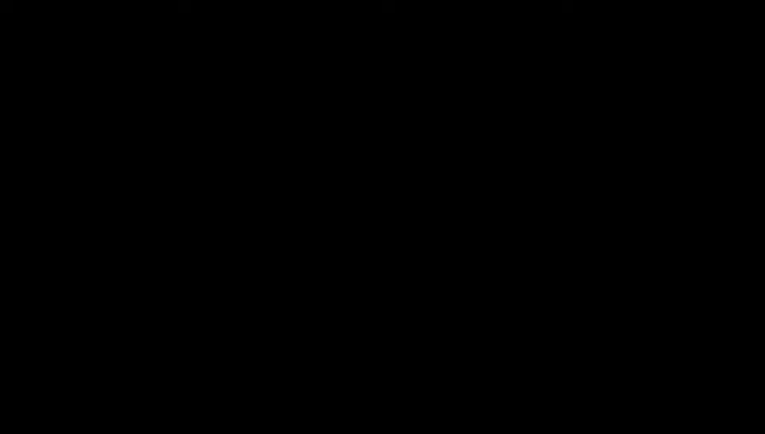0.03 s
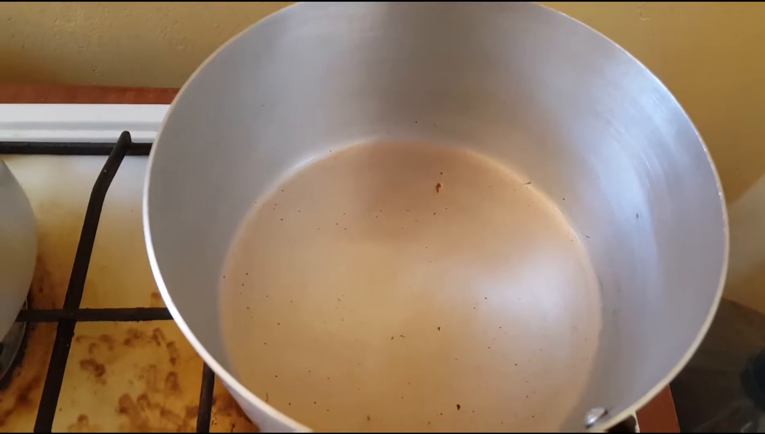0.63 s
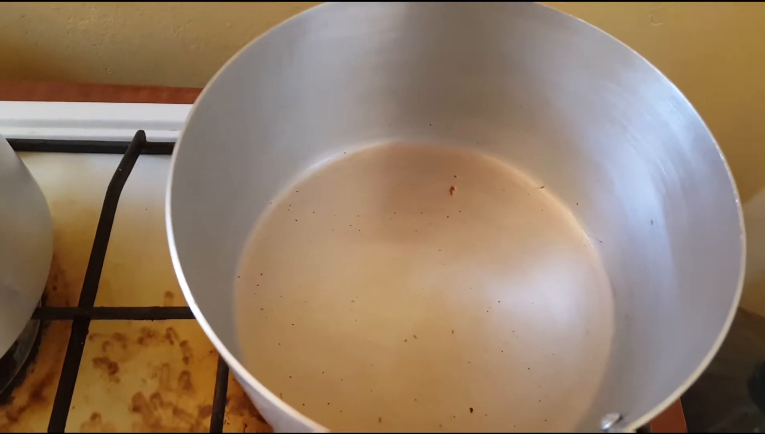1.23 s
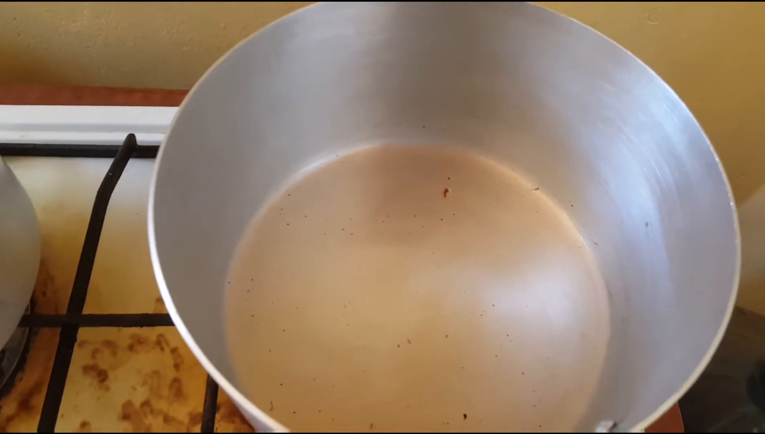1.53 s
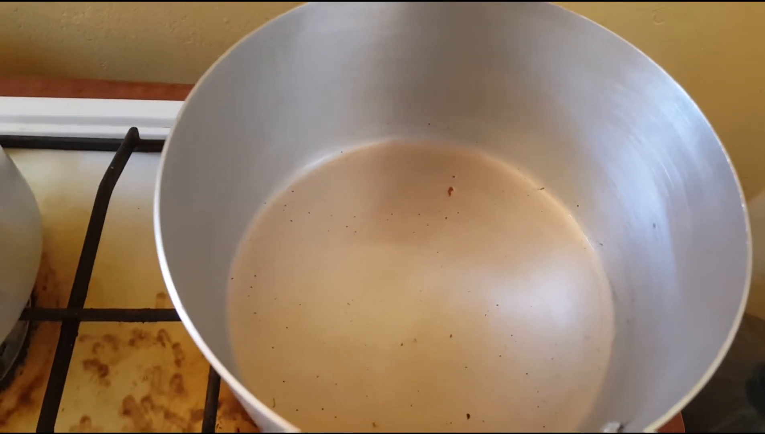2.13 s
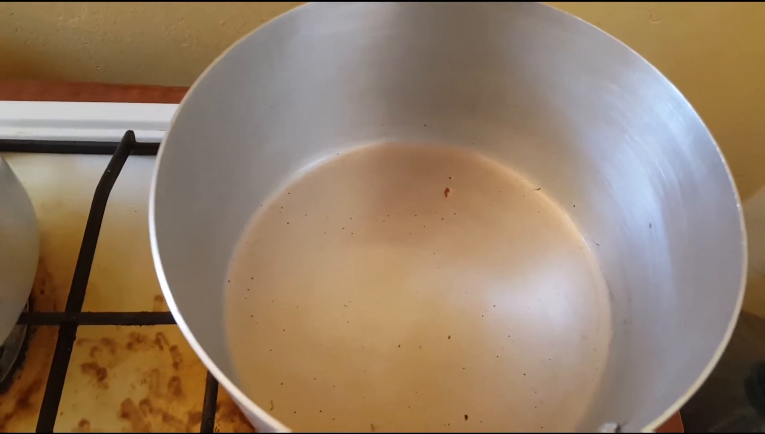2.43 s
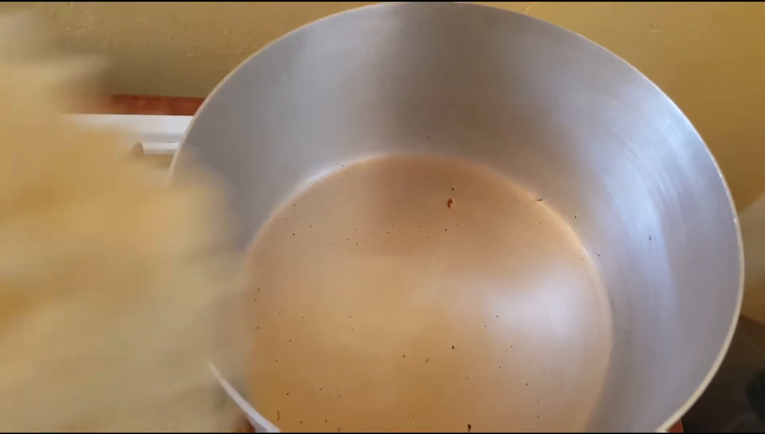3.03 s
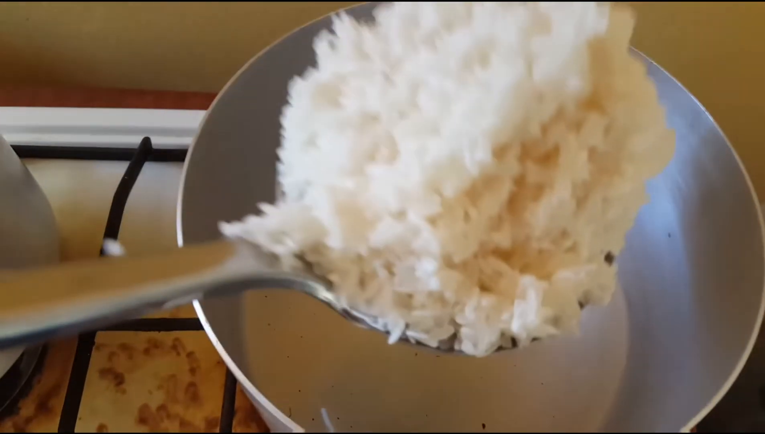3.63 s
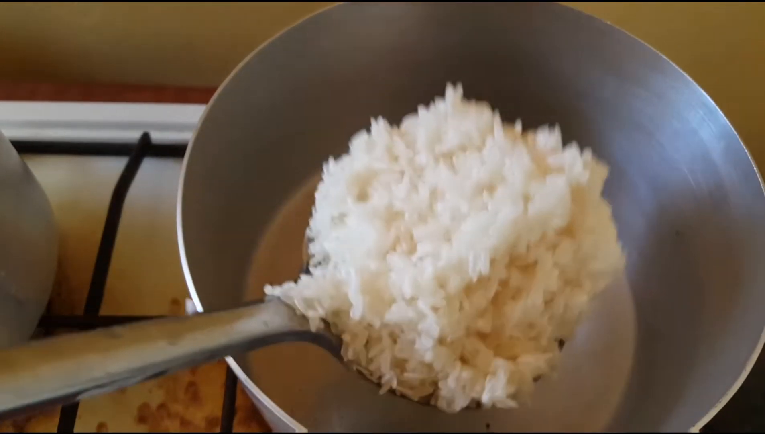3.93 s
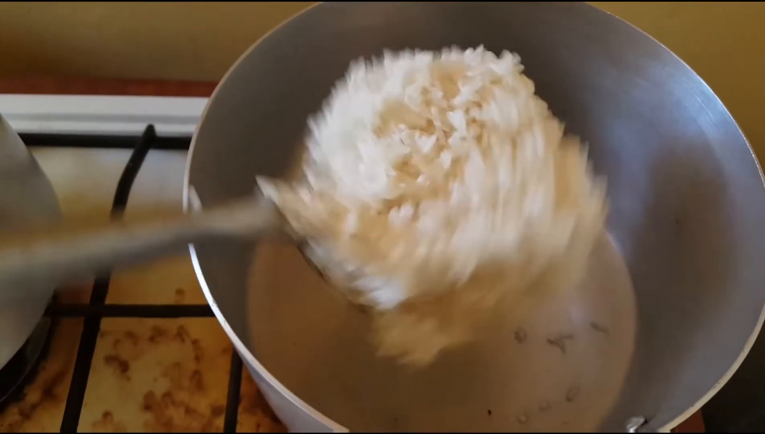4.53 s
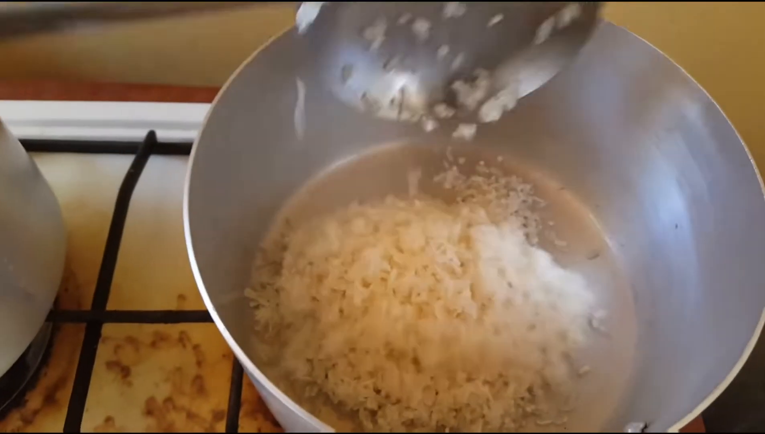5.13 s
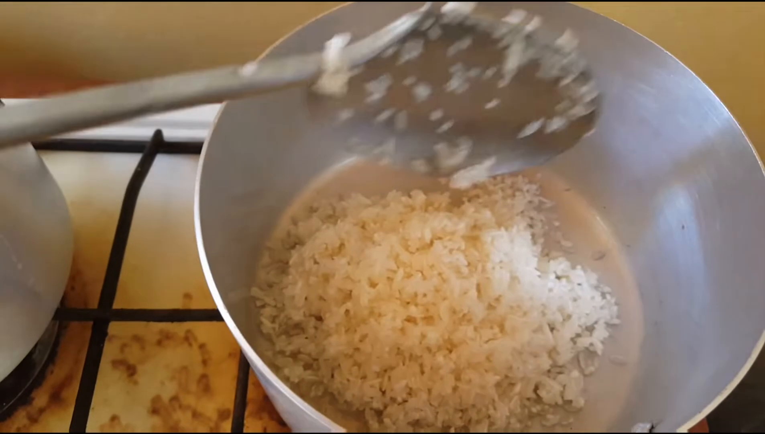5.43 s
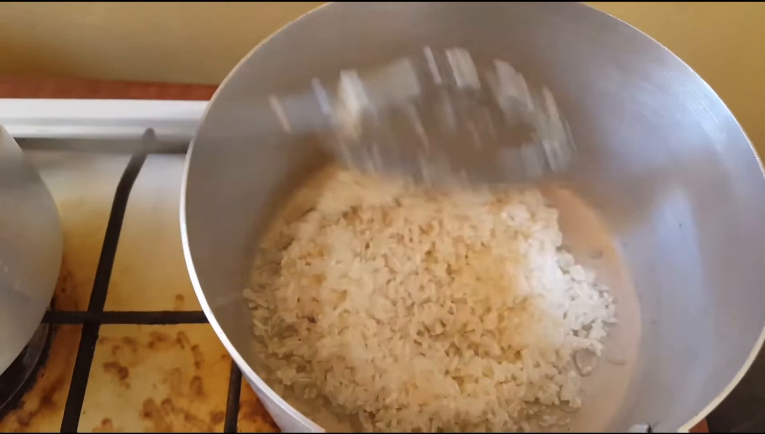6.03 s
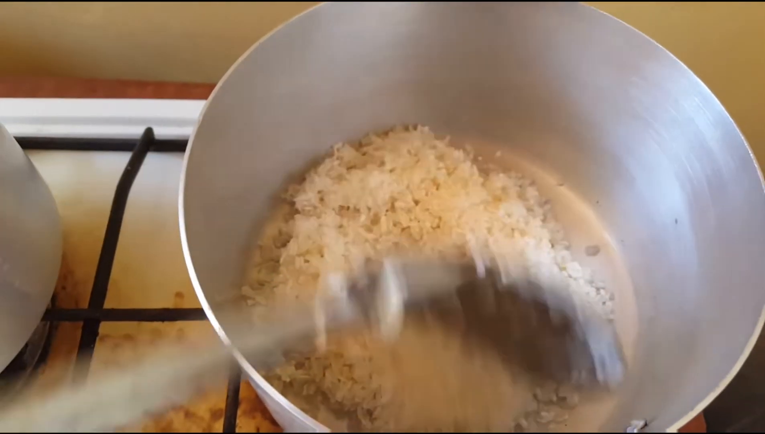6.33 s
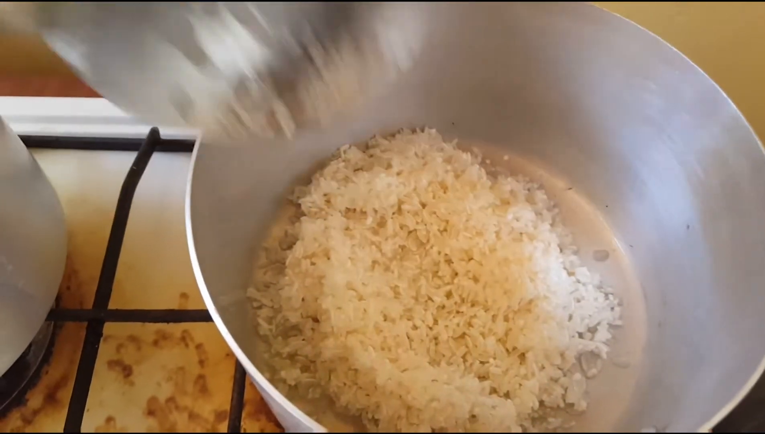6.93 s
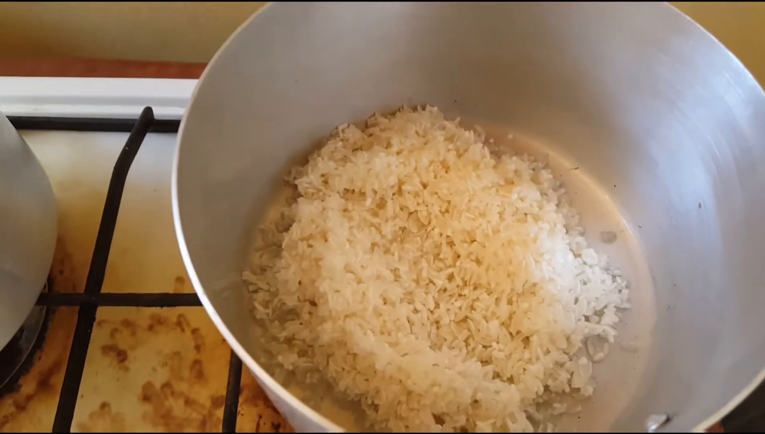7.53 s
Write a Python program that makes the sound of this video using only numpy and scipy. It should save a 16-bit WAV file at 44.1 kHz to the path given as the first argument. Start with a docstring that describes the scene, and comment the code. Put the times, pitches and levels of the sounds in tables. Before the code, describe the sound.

For the first four seconds there is only the very faint, low rush of a gas flame in a small kitchen. A soft knock of kitchenware comes at about 1 second, with a few more faint knocks and scuffs between 2.7 and 3.6 seconds. At 4.2 seconds a spoon taps a metal pot, giving a short, bright ring and a quick, lighter chatter. Stray grains tick softly in the hot oil. At 4.7 seconds clumps of cooked rice land with a soft, wet splat and a faint low hum from the pot. A loud, close sizzle starts at once: fine hiss and crackle over duller bubbling, dotted with sharp, irregular pops, sounding slightly hollow inside the pot. The strongest pops come around 5.5 and 5.8 seconds. The sizzle grows a little louder near 6 seconds and carries on, popping, until the end at about 8 seconds.

```python
"""A low gas flame rushes softly in a small kitchen, with a few faint knocks and scuffs nearby.
A spoon taps a wide aluminium pot of hot oil, exciting the metal's modes, and stray grains spit.
Then a spoonful of cooked rice lands and fries: its water flashes to steam in countless bursts,
each one swing of pressure, heard as fizz, bubbling and pops that ring the air in the pot and the room."""
import sys
import numpy as np
from scipy import signal
from scipy.fft import rfft, irfft
from scipy.io import wavfile

SR = 44100
rng = np.random.default_rng(int(sys.argv[2]) if len(sys.argv) > 2 else 0)


def wav_record(signal):
    """Record a signal, one row per channel, as 16-bit PCM in the file named by sys.argv[1]."""
    frames = np.transpose(np.atleast_2d(signal))
    bounded = np.clip(frames, -1, 1)
    # unit amplitude maps onto the largest positive 16-bit level
    quanta = np.round(bounded * 32767).astype(np.int16)
    wavfile.write(sys.argv[1], SR, quanta)


N = 343539
TIME = np.arange(N) / SR

# spectrum of the gas flame and the quiet kitchen: f/Hz, level/dB
FLAME_SPECTRUM = [(15, -71), (25, -1.5), (46, -13), (64, -1), (84, 1), (113, -11.5), (160, -13), (188, -18),
                  (267, -23), (537, -23.5), (598, -23.5), (826, -28), (2120, -31.5), (6380, -42.5),
                  (15500, -45.5)]
# spectrum of a thin background hiss: f/Hz, level/dB
HISS_SPECTRUM = [(10000, -11), (13000, 2), (15000, 7)]
# faint room hums and a thin whistle: f/Hz, bandwidth/Hz, level/dB
HUM_BANDS = [(71.4, 11.5, -83.5), (275.7, 13.6, -89), (396, 11.6, -95), (888, 81, -93), (7240, 90, -102)]
# fade-in of the background: t/s, gain/dB
BACKGROUND_FADE = [(0, -76), (.1, -66), (.13, 3), (.5, 5.5), (.9, 7.5)]
# soft scuffs: t/s, level/dB, f/Hz, half length/s
SCUFF_EVENTS = [(2.84, -71, 950, .033), (3.385, -72, 430, .028)]
# knocks of kitchenware: t/s, level/dB, f/Hz, T60/s, clack level/dB
KNOCK_EVENTS = [(1.034, -51, 380, 0.3, -59.5), (1.236, -63.5, 1290, .08, -79), (2.714, -63, 750, .05, -80),
                (2.979, -59.5, 1450, 0.036, -57.5), (3.572, -58, 280, 0.11, -59.5)]
# spectrum of a knock's hard clack: f/Hz, level/dB
CLACK_SPECTRUM = [(160, 7), (260, -1), (600, -1.5), (900, 3), (1150, -10), (1480, 3), (1750, -8),
                  (2100, 4.5), (2400, -12), (2650, 0.5), (3000, -15), (4000, -13), (6000, -28),
                  (15000, -39)]
# taps of the spoon on the pot: t/s, level/dB
TAP_EVENTS = [(4.2319, -27.5), (4.324, -41.5), (4.3492, -50.5)]
# modes of the struck metal: f/Hz, level/dB, T60/s
METAL_MODES = [(1380, -4.5, .12), (1960, -8.5, .12), (2250, 2, 0.035), (2540, -2, 0.15), (2772, -7, 0.21),
               (3536, -0.5, .2), (3660, -9, .15), (4000, -11, .22), (4740, -13, 0.39), (5500, -13, 0.29),
               (5701, -12, 0.41), (6000, -10, 0.2), (6869, -8.5, 0.39), (6900, -7, .24), (7050, -13, .22),
               (8250, -9, 0.23), (8380, -7, 0.27), (9502, -7, .1), (9792, -14, .4), (11600, -7, .14),
               (12890, -4, 0.13), (14600, -16, .22)]
# spectrum of a tap's dense clatter: f/Hz, level/dB
CLATTER_SPECTRUM = [(300, -27), (700, -16), (1400, -3.5), (1800, -7), (2300, 1), (3000, -12), (3500, -1),
                    (4300, -9), (5800, -1.5), (6400, -13), (7100, 5), (7700, -12), (9300, -3), (10300, -11),
                    (12400, -5), (12950, 4), (13500, -8), (15500, -10)]
# stray grains spitting in the oil: t/s, level/dB, f/Hz
SPIT_EVENTS = [(4.3996, -42.5, 8000), (4.442, -52, 7000), (4.502, -52.5, 7000), (4.545, -57, 6900),
               (4.566, -54.5, 6780), (4.636, -47.5, 12200), (4.659, -55.5, 3940), (4.6795, -56.5, 7000),
               (5.95, -19, 8550), (6.435, -29, 2750), (7.535, -26, 2700)]
# spectrum of the metal's shimmer after a spit: f/Hz, level/dB
SHIMMER_SPECTRUM = [(1000, -21), (4000, -12), (5500, -1), (6300, -3), (6950, 6), (7700, -16), (8600, -1),
                    (12500, -17), (15500, -17)]
# clumps of rice landing: t/s, level/dB, half length/s
RICE_CLUMPS = [(4.731, -27.5, 0.0047), (4.766, -30, 0.021), (4.852, -37, 0.028), (4.905, -34, 0.0045),
               (4.996, -41, 0.023)]
# spectrum of the landing rice: f/Hz, level/dB
SPLAT_SPECTRUM = [(60, -8), (170, -8), (280, -12), (400, -5), (520, -26), (650, 4), (900, -18), (1370, 4.5),
                  (1700, 8.5), (2500, -4.5), (6000, -9)]
# modes of the pot's base: f/Hz, bandwidth/Hz, gain/dB
BASE_MODES = [(130, 4, -3), (653, 41, 11.5), (1390, 76, 11), (5250, 37, 6)]
# flares as fresh rice meets the oil: t/s, fizz level/dB, bubbling level/dB, half length/s
FRYING_FLARES = [(4.738, -40, -37, 0.0097), (4.88, -33, -60, .065), (4.983, -33.5, -36.5, 0.023),
                 (5.284, -33.5, -53, 0.057), (5.6, -57, -40.5, 0.035), (5.784, -34.5, -40, 0.033),
                 (5.916, -49, -39, 0.04), (6.48, -32.5, -44, 0.11), (7.192, -34.5, -53, 0.068),
                 (7.617, -48, -48, 0.085)]
# spectrum of the coarse bubbling: f/Hz, level/dB
BUBBLING_SPECTRUM = [(40, -14), (80, -12), (150, -14.5), (300, -19), (550, -2.5), (1000, -4.5),
                     (1400, -4.5), (1800, -2), (2400, -4), (3500, -9), (8000, -38.5)]
# spectrum of the fine fizz: f/Hz, level/dB
FIZZ_SPECTRUM = [(300, -26), (1200, -17.5), (2400, -3.5), (3600, -4.5), (5400, -0.5), (6300, -2.5),
                 (8700, 1), (9400, -0.5), (10200, -7.5), (12000, -2.5), (15800, -6.5)]
# loudest steam bursts: t/s, level/dB, f/Hz, snap of the oil film (0-1), depth under the rice (0-1)
STEAM_POPS = [(4.9378, -17.5, 6660, .7, 0.2), (4.961, -21, 5730, .8, 0), (4.989, -27, 900, 1, .4),
              (5.0576, -15, 6500, .4, 0.05), (5.0778, -12, 6660, .4, 0.2), (5.0916, -16, 9000, .6, 0.63),
              (5.2074, -17.5, 7000, .7, 0.4), (5.2457, -18, 1800, 1, 0.05), (5.3985, -16.5, 1350, .1, 0),
              (5.464, -13.5, 8000, 0.2, 0.15), (5.471, -16.5, 1808, .1, 0), (5.5451, -8, 7500, .6, 0.2),
              (5.5791, -25, 1130, .2, 0), (5.606, -21, 3140, 1, 0.1), (5.6179, -31, 2450, .4, 0.65),
              (5.6816, -15.5, 2180, .3, 0.14), (5.7345, -17, 1700, .5, 0.46), (5.8167, -19, 1200, 0.9, 1),
              (5.835, -9, 9800, 0.7, 0.2), (5.8688, -16.5, 5940, 1, 0.2), (5.98, -20, 2820, 1, 0.34),
              (6.0502, -17, 9500, .8, 0), (6.162, -29, 620, 0.9, 0.94), (6.3038, -15, 3180, 0.4, 0),
              (6.3345, -12, 9000, .7, 0.1), (6.487, -17, 8000, .9, 0.44), (6.5359, -13, 3650, .2, 0.43),
              (6.559, -15, 2330, 0.5, 0.6), (6.6146, -11.5, 4250, .5, 0), (6.6716, -17.5, 2800, 0.8, 0.33),
              (6.7848, -19, 1270, 1, 0.51), (7.2764, -10, 9000, .8, 0), (7.4474, -28.5, 700, .5, 0.55),
              (7.5167, -13, 2500, 0.1, 0.2)]
# shading of the pot's mouth by the spoon: t/s, share (0-1)
SPOON_SHADING = [(4.7, 0.26), (5.05, 0.7), (5.16, 0.83), (5.66, 0.75), (5.8, 0.4), (6.5, 0.44),
                 (6.85, 0.07), (7.8, 0.04)]
# air modes of the pot: f/Hz, bandwidth/Hz, gain when open/dB, gain under the spoon/dB
CAVITY_MODES = [(378, 9, 8.5, 8), (500, 11, -5, 3.5), (607, 16, 7, 10), (683, 25, 4.5, 7), (755, 15, 7, 3),
                (950, 13, 4, 7.5), (1276, 68, -3.5, 11.5), (1365, 36, 9, -0.5), (1472, 69, 8.5, -1),
                (1815, 200, -5.5, 2.5), (2088, 33, 1, 14), (2533, 49, 4.5, -5), (2770, 70, 5, 1.5),
                (3875, 25, 7.5, 2), (4950, 59, 5.5, -7), (6800, 49, 4, 3), (8920, 70, 2.5, 1)]

LANDS_S, CATCH_S = 4.707, .035  # the rice meets the oil; rise time of the frying
FIZZ_HEAPED_DB, FIZZ_SPREAD_DB = -34, -29.5  # spread rice fizzes louder than heaped rice
SPREAD_S, SPREAD_TAKES_S = 5.984, 0.065
BUBBLING_DB, BUBBLING_DB_PER_S = -42.5, 2  # bubbling builds as the grains heat through
DRUM_HZ, DRUM_DB, DRUM_T60_S = 164, -49.5, 1.25  # the first clump's weight sets the whole base humming
SMALL_POP_HZ = 1900, 11500  # lowest and highest pitch
SMALL_POP_DB, SMALL_POP_DB_PER_OCTAVE, SMALL_POP_SPREAD_DB = 4.5, 1.5, 4.5  # relative to the fizz
SNAP_HZ, SNAP_DB = 9500, 3  # a full snap of the oil film, relative to its burst
THUMP_HZ, THUMP_DB = 178, -35.5  # a buried pocket heaves the rice above it


def undb(db):
    """Amplitude ratio: tenfold for every 20 dB."""
    return 10 ** (np.asarray(db) / 20)


def unit(x):
    """Normalisation to rms 1."""
    return x / np.sqrt(np.mean(x ** 2) + 1e-18)


def curve(table):
    """Linear interpolation of (t, value) points at every sample."""
    return np.interp(TIME, *np.transpose(table))


def add(out, s, sound):
    """Superposition: a sound joins the mix at s seconds."""
    i = max(int(round(s * SR)), 0)
    out[i:i + len(sound)] += sound[:max(N - i, 0)]


def colour(x, points, size=4096):
    """Minimum-phase filtering through (f/Hz, level/dB) points, with unit power gain."""
    hz, db = np.transpose(points)
    bin_hz = np.maximum(np.arange(size // 2 + 1) * SR / size, 1)
    gain = undb(np.interp(np.log(bin_hz), np.log(hz), db))
    cepstrum = irfft(np.log(gain))
    cepstrum[1:size // 2] *= 2  # folding the cepstrum makes the response causal
    cepstrum[size // 2 + 1:] = 0
    response = irfft(np.exp(rfft(cepstrum)))
    return signal.oaconvolve(x, response / np.linalg.norm(response))[:len(x)]


def resonate(x, hz, width):
    """Second-order resonance, gain 1 at its centre."""
    return signal.lfilter(*signal.iirpeak(hz, hz / width, fs=SR), x)


def noise_band(samples, hz, width):
    """Band-limited noise from two resonances in series, rms 1."""
    return unit(resonate(resonate(rng.standard_normal(samples), hz, width), hz, width))


def fade(t60):
    """Exponential decay by 60 dB in t60 seconds, one second long."""
    return np.exp(-np.log(1000) * TIME[:SR] / t60)


def swell(s, half_length):
    """Gaussian envelope centred on s seconds, peak 1."""
    return np.exp(-.5 * ((TIME - s) / half_length) ** 2)


def wander(rate):
    """Random modulation: ramps between `rate` values a second, with a spread near 1."""
    return np.interp(TIME * rate, np.arange(N), rng.standard_normal(N)) * np.sqrt(3 / 2)


def impulses(rate, spread_db, ceiling_db):
    """Poisson process: `rate` impulses a second, of capped log-normal size, at rms 1."""
    happens = rng.random(N) < rate / SR
    size = undb(np.minimum(spread_db * rng.standard_normal(N), ceiling_db))
    return unit(happens * size * np.sign(rng.standard_normal(N)))


def tail(t60):
    """Reverberation: dense, exponentially decaying reflections with unit energy."""
    echoes = (rng.standard_normal(SR) * fade(t60))[:int(t60 * SR) + 1]
    return echoes / np.linalg.norm(echoes)


def scatter(x, t60):
    """Diffuse reflection: each burst starts at its own spot, so gets its own tail of equal energy."""
    retained = np.exp(-2 * np.log(1000) / (t60 * SR))
    energy = signal.lfilter([0, 1 - retained], [1, -retained], x ** 2)
    return np.sqrt(energy) * rng.standard_normal(N)


def flame_and_room():
    """Broadband and narrowband noise: the burner's fluttering rush, the room's hum and a thin hiss."""
    rush = colour(rng.standard_normal(N), FLAME_SPECTRUM) * undb(-71 + 0.17 * wander(2.5))
    hum = sum(undb(db + 0.62 * wander(2)) * noise_band(N, hz, width) for hz, width, db in HUM_BANDS)
    hiss = undb(-89.5) * colour(rng.standard_normal(N), HISS_SPECTRUM)
    return (rush + hum + hiss) * undb(curve(BACKGROUND_FADE))


def scuffs():
    """Friction noise: brief, dull rubbing in a broad band."""
    return sum(undb(db) * swell(s, half_length) * noise_band(N, hz, width=hz)
               for s, db, hz, half_length in SCUFF_EVENTS)


def knocks():
    """Damped vibration of knocked kitchenware: a hard clack and one ringing pitch in a rough body."""
    out = np.zeros(N)
    for s, db, hz, t60, clack_db in KNOCK_EVENTS:
        body = noise_band(SR, hz, width=.5 * hz)
        ring = undb(-1.5) * np.sin(2 * np.pi * hz * TIME[:SR])
        clack = undb(clack_db) * colour(rng.standard_normal(SR), CLACK_SPECTRUM)
        add(out, s, (undb(db) * (body + ring) / np.sqrt(2) + clack) * fade(t60))
    return out


def spoon_taps():
    """Beating: the spoon chatters briefly on the round pot, which rings in close pairs of modes."""
    out, t = np.zeros(N), TIME[:SR]
    attack = 1 - np.exp(-t / 0.0022)
    for s, db in TAP_EVENTS:
        ring = 0
        for hz, mode_db, t60 in METAL_MODES:
            phase, twin_phase, split = rng.random(3)
            twin_hz = hz + 25 + 50 * split
            mode = np.sin(2 * np.pi * (hz * t + phase))
            twin = .5 * np.sin(2 * np.pi * (twin_hz * t + twin_phase))
            ring = ring + undb(mode_db) * fade(t60) * (mode + twin)
        decay = fade(.05) + undb(-13) * fade(.3)
        clatter = colour(rng.standard_normal(SR) * decay, CLATTER_SPECTRUM)
        add(out, s, undb(db) * attack * (undb(-10) * ring + undb(-0.5) * clatter))
    return out


def spits():
    """Transient excitation: a stray grain hits the oil with a tick, and the thin metal shimmers."""
    out = np.zeros(N)
    for s, db, hz in SPIT_EVENTS:
        tick = unit(resonate(rng.standard_normal(SR), hz, width=0.25 * hz)) * fade(0.079)
        shimmer = colour(rng.standard_normal(SR), SHIMMER_SPECTRUM) * fade(0.37)
        add(out, s, undb(db - 7.5) * (tick + undb(-11) * shimmer))
    return out


def rice_landing():
    """Forced vibration: each wet clump is a shower of soft impacts driving the modes of the pot's base."""
    shower = sum(undb(db) * swell(s, half_length) for s, db, half_length in RICE_CLUMPS)
    impacts = shower * impulses(rate=5400, spread_db=-0.5, ceiling_db=6)
    base = sum(undb(db) * resonate(impacts, hz, width) for hz, width, db in BASE_MODES)
    out = undb(-2) * colour(impacts, SPLAT_SPECTRUM) + undb(2) * base
    drum = undb(DRUM_DB) * np.sin(2 * np.pi * DRUM_HZ * TIME[:SR]) * fade(DRUM_T60_S)
    add(out, RICE_CLUMPS[0][0], drum)
    return out


def frying_levels():
    """Incoherent powers add: fizz and bubbling levels in dB follow how much wet rice touches the oil."""
    age = TIME - LANDS_S
    onset = np.clip(age / CATCH_S, 0, 1)
    spread = .5 + .5 * np.tanh((TIME - SPREAD_S) / SPREAD_TAKES_S)
    fizz_power = undb(FIZZ_HEAPED_DB + spread * (FIZZ_SPREAD_DB - FIZZ_HEAPED_DB)) ** 2
    bubble_power = undb(BUBBLING_DB + BUBBLING_DB_PER_S * age) ** 2
    for s, fizz_db, bubble_db, half_length in FRYING_FLARES:
        flare = swell(s, half_length)
        fizz_power += undb(fizz_db) ** 2 * flare
        bubble_power += undb(bubble_db) ** 2 * flare
    return [10 * np.log10(onset * power + 1e-18) for power in (fizz_power, bubble_power)]


def bubbling(level_db):
    """Shot noise: large, dull bubbles break at random between the grains."""
    bubbles = impulses(rate=2500, spread_db=3.5, ceiling_db=13.5)
    bubbles *= undb(level_db - 3.5 + 0.96 * wander(30))
    return colour(bubbles + undb(-7) * scatter(bubbles, t60=.035), BUBBLING_SPECTRUM)


def fizz(level_db):
    """Flash boiling: tiny droplets turn to steam in flurries, a sharp crackle over a dense hiss."""
    crackle = impulses(rate=2000, spread_db=7, ceiling_db=14)
    hiss = impulses(rate=18000, spread_db=1, ceiling_db=12)
    flurry_db = 1.2 * wander(80) + .5 * wander(25)
    steam = (undb(-4) * crackle + undb(-7) * hiss) * undb(level_db + flurry_db)
    return colour(steam + undb(-7) * scatter(steam, t60=.02), FIZZ_SPECTRUM)


def pressure_swing(hz):
    """Monopole radiation: a steam pocket swells and collapses, one push and one pull of air, peak 1."""
    half = int(.7 * SR / hz) + 2
    phase = 2 * np.pi * hz * np.arange(-half, half + 1) / SR
    return -phase * np.exp((1 - phase ** 2) / 2)


def spatter(level_db):
    """Random superposition: middling pockets of seven sizes burst, so the crackle's colour shifts."""
    out = np.zeros(N)
    for hz in np.geomspace(1500, 9000, num=7):
        ticks = impulses(rate=45, spread_db=0.5, ceiling_db=5.5) * undb(level_db - 19.5)
        reflections = undb(-2.5) * scatter(ticks, t60=0.026)
        pulse = pressure_swing(hz)
        out += signal.oaconvolve(ticks + reflections, pulse / np.linalg.norm(pulse), "same")
    return out


def add_pop(out, s, peak, hz):
    """Direct and scattered sound: the sharper a burst, the more spray and reflection trails it."""
    pulse = pressure_swing(hz)
    trail_db = -5 + 1.2 * np.log2(hz / 2500)
    sound = undb(trail_db) * signal.fftconvolve(pulse, tail(t60=0.011))
    sound[:len(pulse)] += pulse
    lead_s = len(pulse) // 2 / SR  # centres the pulse on s
    add(out, s - lead_s, peak * sound)


def small_pops(level_db, count):
    """Impulsive sources: lesser pockets burst at random, as strongly as the rice is frying."""
    out = np.zeros(N)
    low_hz, high_hz = SMALL_POP_HZ
    for k, (when, size, strength) in enumerate(rng.random((count, 3))):
        s = LANDS_S + (TIME[-1] - LANDS_S) * (k + when) / count
        octaves = size * np.log2(high_hz / low_hz)
        db = SMALL_POP_DB + SMALL_POP_DB_PER_OCTAVE * octaves + SMALL_POP_SPREAD_DB * (2 * strength - 1)
        add_pop(out, s, undb(np.interp(s, TIME, level_db) + db), low_hz * 2 ** octaves)
    return out


def big_pops():
    """Sudden expansion: big steam pockets snap the oil film and, if buried under the rice, thump."""
    out = np.zeros(N)
    for s, db, hz, snap, depth in STEAM_POPS:
        add_pop(out, s, undb(db), hz)
        add_pop(out, s, snap * undb(db + SNAP_DB), SNAP_HZ)
        add_pop(out, s, depth * undb(THUMP_DB), THUMP_HZ)
    return out


def pot_air(x):
    """Cavity resonance: the frying rings the air in the pot; the spoon's shading alters each mode's gain."""
    shading = curve(SPOON_SHADING)
    for hz, width, open_db, shaded_db in CAVITY_MODES:
        gain = undb(open_db + shading * (shaded_db - open_db))
        x = x + (gain - 1) * resonate(x, hz, width)
    return x


def scene():
    """Superposition of the direct sound, the kitchen's short reverberation and the background, in mono."""
    fizz_db, bubble_db = frying_levels()
    sizzle = fizz(fizz_db) + bubbling(bubble_db) + spatter(fizz_db)
    pops = big_pops() + small_pops(fizz_db, count=60)
    oil = sizzle + pops + rice_landing() + spits()
    direct = pot_air(oil) + spoon_taps() + knocks() + scuffs()
    reverberation = undb(-15) * signal.oaconvolve(direct, tail(t60=.33))[:N]
    return (direct + reverberation + flame_and_room())[None]


def record(dry):
    """Saturation and band limiting: the microphone rounds peaks and loses the deepest bass and the top."""
    rounded = .5 * np.tanh(dry / .5)
    highpass = signal.butter(1, 45, "highpass", fs=SR, output="sos")
    lowpass = signal.ellip(10, .2, 70, 15850, fs=SR, output="sos")
    thinned = signal.sosfilt(highpass, rounded)
    notched = thinned - .55 * resonate(thinned, hz=47, width=20)
    return signal.sosfilt(lowpass, notched)


dry = scene()
out = record(dry)
wav_record(out)
```